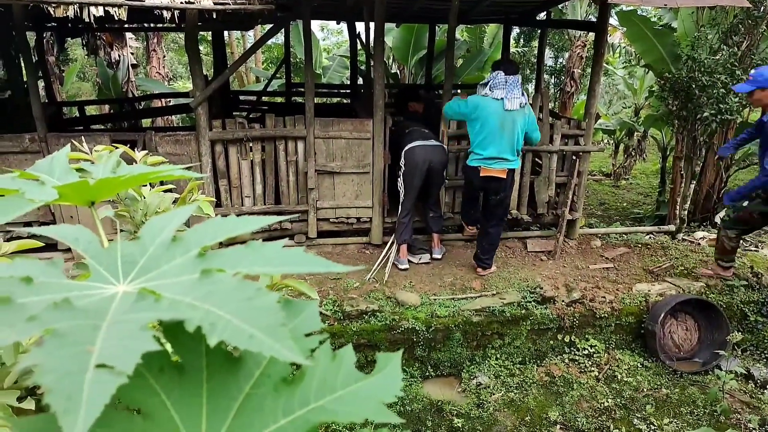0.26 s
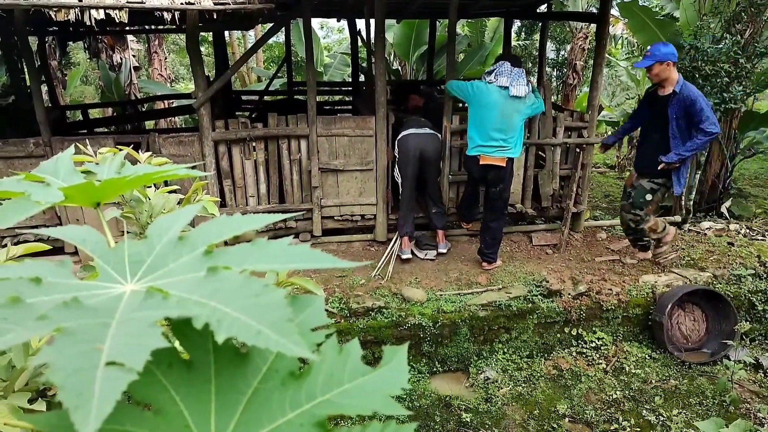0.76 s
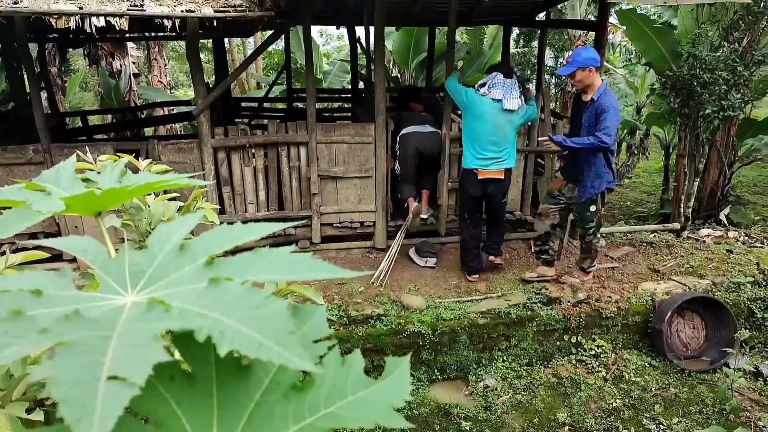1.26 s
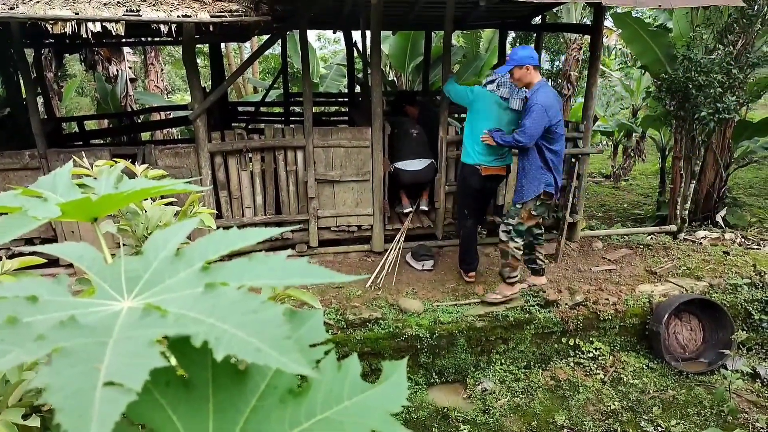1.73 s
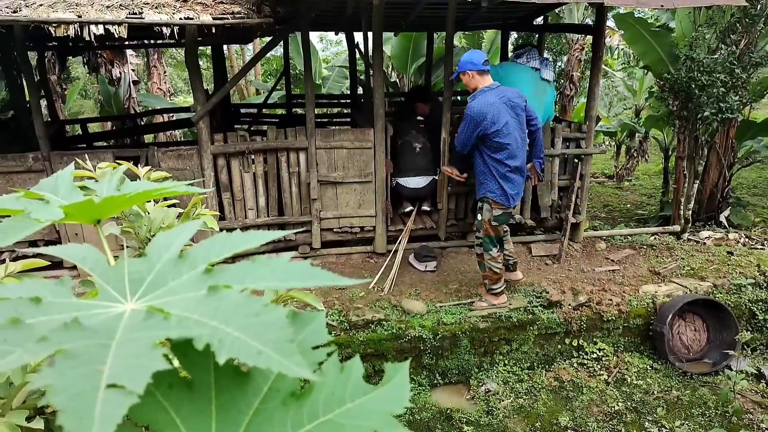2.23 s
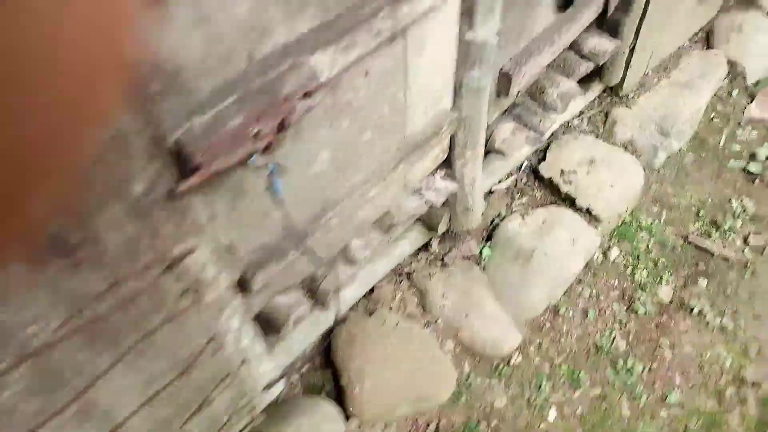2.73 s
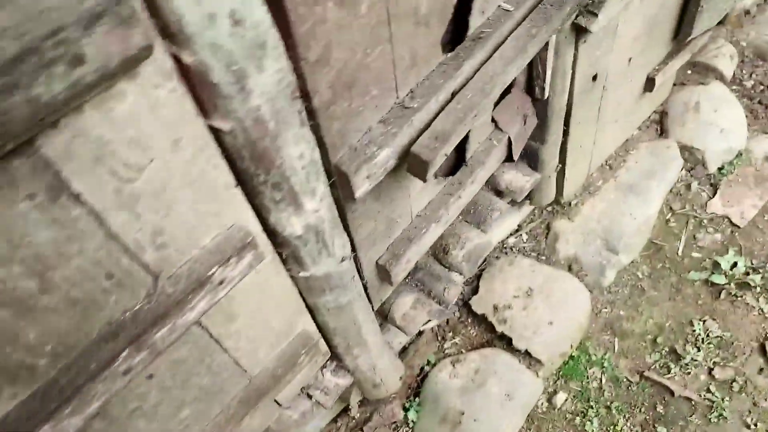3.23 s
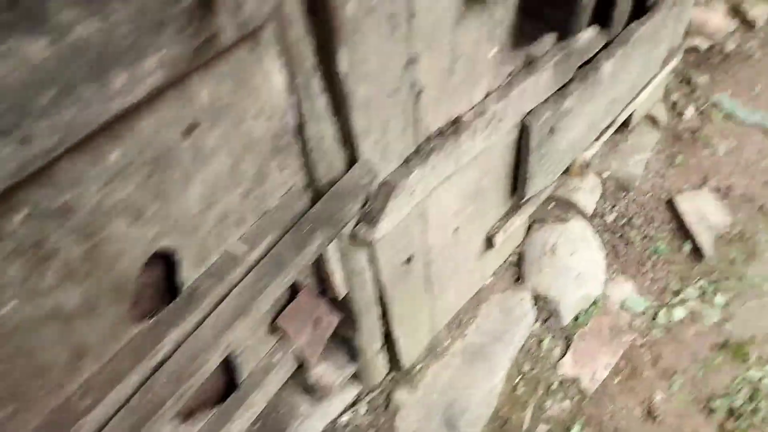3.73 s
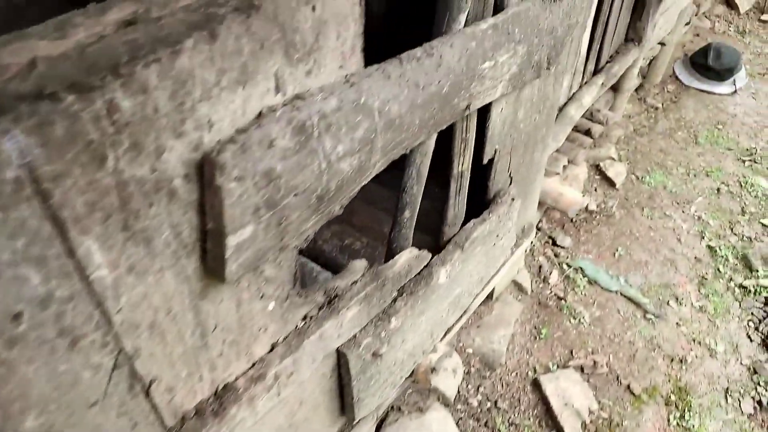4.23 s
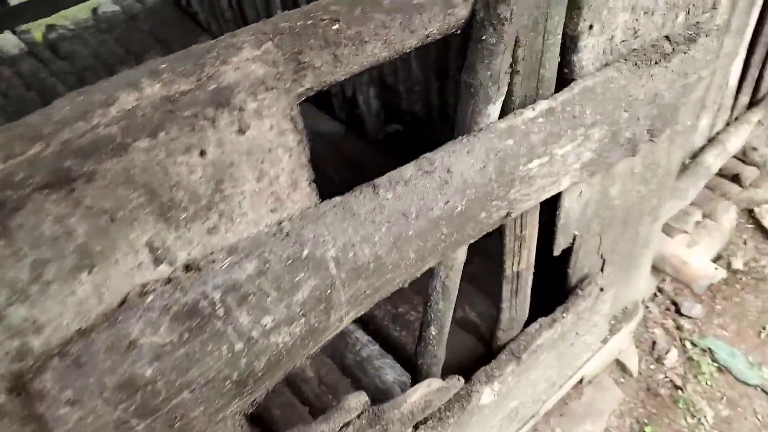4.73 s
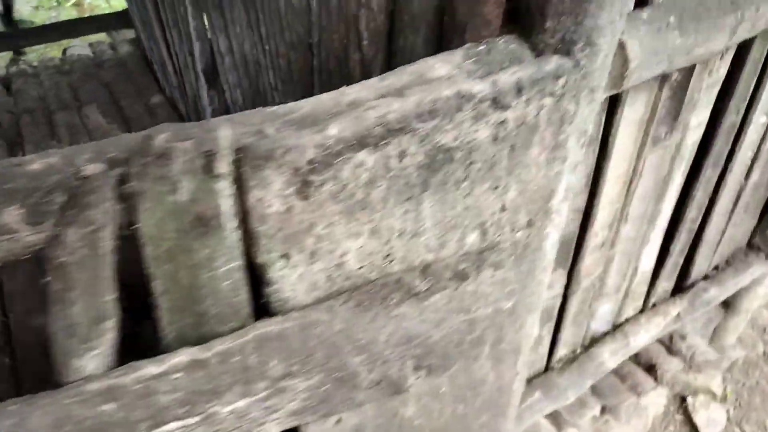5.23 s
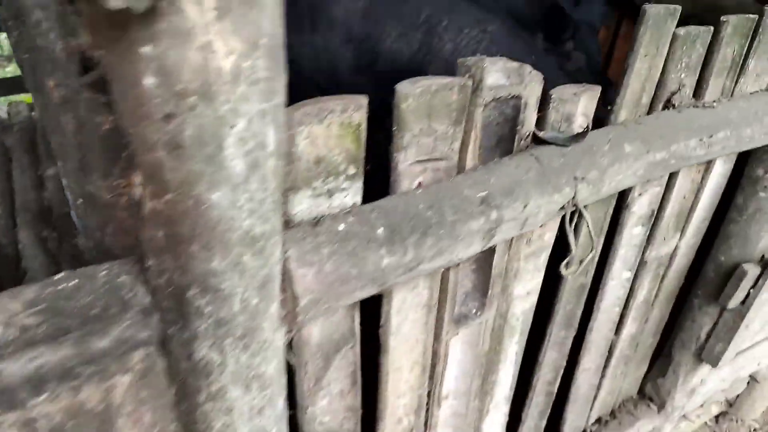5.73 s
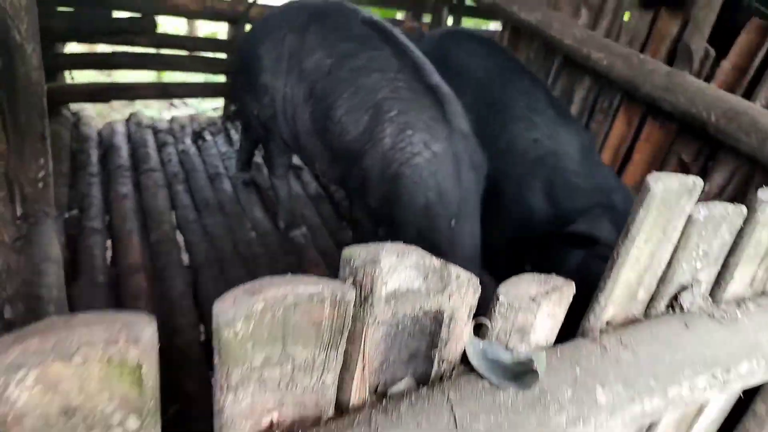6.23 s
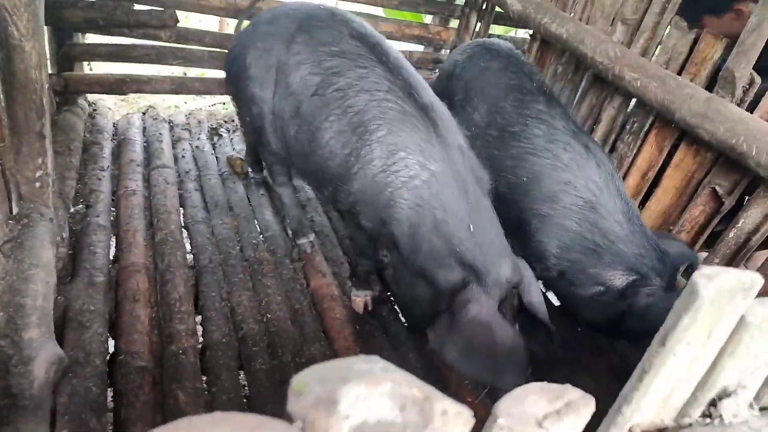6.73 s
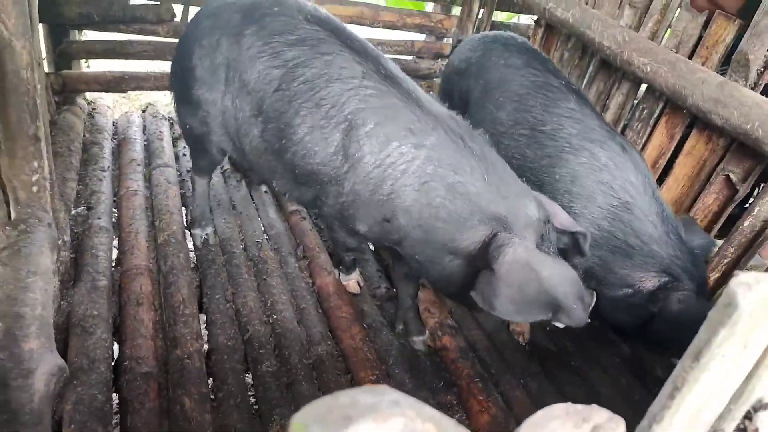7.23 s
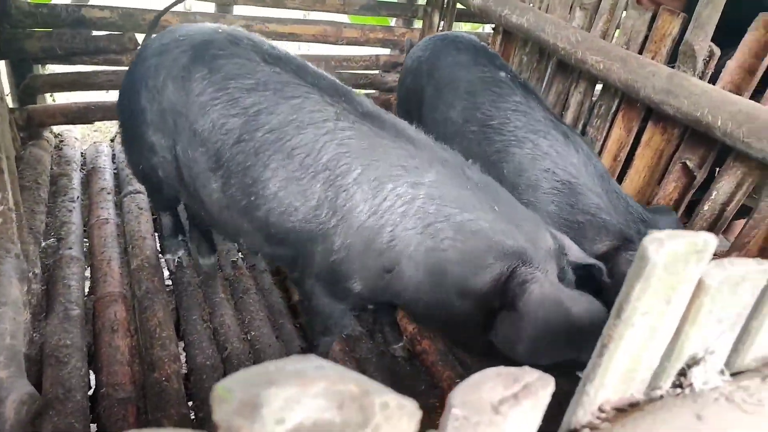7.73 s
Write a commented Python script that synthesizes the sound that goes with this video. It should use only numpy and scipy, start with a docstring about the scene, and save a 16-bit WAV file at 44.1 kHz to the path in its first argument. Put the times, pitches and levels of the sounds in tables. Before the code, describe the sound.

Harsh, whistling pig squeals and throaty grunts in quick succession outdoors; a tiny dropout, then longer, rougher screams right beside wooden planks.

```python
"""Squealing and grunting pigs in a wooden pen

One pig screams in long squeals, first heard from the yard, then beside the boards and over the fence.
A squeal is a whistle near 2 kHz over slower flapping of the folds, roughened into rasp.
Grunts are slow flaps of the throat that ring the snout; a few short squeaks glide between them.
Low yard air lies beneath, and the sound cuts out for an instant before resuming close to the planks."""
import sys
import numpy as np
from scipy import signal
from scipy.fft import rfft, irfft, next_fast_len
from scipy.io import wavfile
from scipy.ndimage import uniform_filter1d

SR = 44100
rng = np.random.default_rng(int(sys.argv[2]) if len(sys.argv) > 2 else 0)


def transcribe(signal):
    """Save signal, clipped to [-1, 1], as a 16-bit WAV file at the path in sys.argv[1]."""
    frames = np.atleast_2d(signal).T
    limited = np.clip(frames, -1, 1)
    pcm = np.round(limited * 32767).astype(np.int16)
    wavfile.write(sys.argv[1], SR, pcm)


N = 351477  # length in samples

# The instant of near silence between the yard and the planks. Each row: time in seconds, gain in dB.
CUT = [(2.602, 0), (2.609, -45), (2.621, -45), (2.628, 0)]


def amp(db):
    """Turns decibels into gain."""
    return 10 ** (np.asarray(db) / 20)


def evened(x):
    """Scales to rms 1."""
    return x / np.sqrt(np.mean(abs(x) ** 2) + 1e-20)


def read(points, hz):
    """Reads a curve joined by straight lines on a log frequency axis."""
    f, value = np.transpose(points)
    return np.interp(np.log(hz + 1), np.log(f + 1), value)


def over_time(points, t):
    """Reads a curve of (seconds, value) joined by straight lines."""
    return np.interp(t, *np.transpose(points))


def bump(x, middle, half):
    """A smooth bell of height 1."""
    return np.exp(-((x - middle) / half) ** 2)


def add(mix, s, sound):
    """Lays a sound into the mix at a time in seconds."""
    part = mix[round(s * SR):][:len(sound)]
    part += sound[:len(part)]


def track(calls):
    """Lays (start, sound) calls on one time line."""
    mix = np.zeros(N)
    for call in calls:
        add(mix, *call)
    return mix


def shaped(x, gain):
    """Filters by a gain that is a function of frequency."""
    size = next_fast_len(len(x) + 2048)
    spectrum = rfft(x, size) * gain(np.fft.rfftfreq(size, 1 / SR))
    return irfft(spectrum, size)[:len(x)]


def band(x, lo, hi):
    """A steep band-pass; bands that share an edge add up without a gap."""
    return shaped(x, lambda f: 1 / (1 + (f / hi) ** 24) - 1 / (1 + (f / lo) ** 24))


def wobble(n, hz):
    """Smooth random motion of rms 1, up to about a rate."""
    return evened(shaped(rng.standard_normal(n), lambda f: np.exp(-.5 * (f / hz) ** 2)))


def loudness(x, size):
    """Running rms over about a number of samples."""
    power = uniform_filter1d(uniform_filter1d(x ** 2, size), size)
    return np.sqrt(abs(power) + 1e-12)


def partials(turns, count):
    """A series of equal harmonics, each with its own random phase."""
    step, wave, out = np.exp(2j * np.pi * turns), 1, 0
    for phase in rng.random(count):
        wave = wave * step
        out = out + wave * np.exp(2j * np.pi * phase)
    return out


def yard(apart=0.93):
    """Steady outdoor air over a slowly changing rumble, its bass nearly alike in both channels."""
    # Spectrum of the yard air. Each row: frequency in Hz, relative density in dB.
    air_curve = [(12, -25), (20, 2.5), (27, -6), (64, -3.5), (181, -17.5), (642, -27), (970, -30),
                 (2340, -23.5), (2690, -16.5), (3170, -28), (5810, -20.5), (7240, -21), (8080, -29),
                 (14400, -43)]
    # Swell of the rumble. Each row: time in seconds, gain in dB.
    rumble_curve = [(0, -1), (1.599, 2), (2.551, 3), (2.7, -6), (4.2, -7), (5.198, 2), (6.6, 2), (7.301, 0),
                    (7.97, 3)]
    air_db, swell_db = -50, .8
    common, side = (shaped(rng.standard_normal(N), lambda f: amp(read(air_curve, f))) for _ in range(2))
    side = apart * (band(side, 500, 16000) + .35 * band(side, 5, 50))
    side = side * np.array([[1], [-1]])
    rumble = band(common, 5, 250)
    air = common - rumble + rumble * amp(over_time(rumble_curve, np.arange(N) / SR))
    return amp(air_db + swell_db * wobble(N, 0.8)) * (air + side) / np.std(common)


def ring(x, size, spread=0.081):
    """Rings the snout's resonances, shifted by one factor and each a little by chance."""
    # Resonances of a grunting snout. Each row: frequency in Hz, width in Hz, level in dB.
    snout_modes = [(57.2, 28, -2), (92.5, 48.6, 9), (173, 35, 4), (257.4, 176, 5.5), (350, 34.4, 16.5),
                   (441.8, 89, 2), (794, 72.5, 3), (1094, 88, -5.5), (1499, 59, -1), (1904, 190, -9.5),
                   (3380, 370, -16.5), (3870, 240, -10), (5620, 11700, -23.5)]
    shifts = size * np.exp(spread * rng.uniform(-1.14, 1, len(snout_modes)))
    out = 0
    for k, (hz, width, db) in enumerate(snout_modes):
        peak = signal.iirpeak(hz * shifts[k], hz / width, SR)
        out = out + amp(db) * signal.lfilter(*peak, x) * (-1) ** k  # neighbours in opposite polarity
    return out


def grunt(start, attack, hold, chest_db, mouth_db, rasp_db, snout_hz, knock=0.38):
    """Slack folds flap almost evenly, slower in a bigger pig; each flap's knock and puff ring the snout."""
    # Deep boom of the grunts as the microphone moves along the pen. Each row: time in seconds, gain in dB.
    boom_curve = [(1.5, 5.5), (3.7, 4), (4.9, 6), (6.5, 9.5), (7.1, 7), (7.6, 3)]
    boom_per_db, usual_db = -0.584, -41  # the harder the grunt, the smaller the share of its boom
    onset_db, fall_db_per_s, tail_s = -11, 381, .09
    opening_range_db = 4.5  # the mouth opens during each grunt
    puff_s, leak, chest_puff = .006, .2, .45  # puff decay, air between puffs, share of puffs in the chest
    treble_leak = 0.19  # share of the highest rasp that leaves the snout

    release = attack + hold
    t = np.arange(0, release + tail_s, 1 / SR)
    n = len(t)
    size = snout_hz / 340
    flap_hz = 46 * size ** .7
    rise_db = onset_db * np.maximum(1 - t / attack, 0)
    envelope_db = rise_db - fall_db_per_s * np.maximum(t - release, 0)
    opening_db = opening_range_db * (np.minimum(t / release, 1) - .5)

    turns = np.cumsum(flap_hz * np.exp(.04 * wobble(n, 25))) / SR
    knocks = evened(np.diff(np.floor(turns), prepend=-1))  # one click a flap
    puff_shape = leak + np.exp(-(turns % 1) / flap_hz / puff_s)
    puffs = evened(puff_shape * rng.standard_normal(n))

    body = ring(knocks + chest_puff * puffs, size)
    boom, chest = band(body, 20, 170), band(body, 170, 520)
    boom_db = over_time(boom_curve, start) + boom_per_db * (chest_db - usual_db)
    chest = (chest + boom * amp(boom_db)) / np.std(chest + boom)

    snout = ring(knock * knocks + puffs, size)
    mouth = band(snout, 520, 1150)
    rasp = band(snout, 1150, 7500) + treble_leak * band(snout, 7500, 16000)
    snout = (mouth + amp(rasp_db) * rasp) / np.std(mouth)
    return start, amp(chest_db + envelope_db) * (chest + amp(mouth_db + opening_db) * snout)


def squeak(start, end, first_hz, last_hz, level_db, jitter):
    """The folds catch for a moment and give one short gliding whistle."""
    n = round((end - start) * SR)
    hz = np.linspace(first_hz, last_hz, n) * (1 + jitter * wobble(n, 170))
    whistle = np.sin(2 * np.pi * np.cumsum(hz) / SR) * amp(2.0 * wobble(n, 100))
    return start, amp(level_db) * evened(whistle) * signal.windows.tukey(n, .6)


def mouthed(drive, throat, gape, stretch, patchy_db=2.5):
    """Formants slide with the pitch and open with the jaw; a slow random unevenness roughens the colour."""
    # Throat and mouth colour with the jaw wide. Each row: frequency in Hz, gain in dB.
    wide_throat = [(350, 2), (575, 2), (870, -12), (1160, 5), (1450, -18), (1750, -2.5), (2030, 16),
                   (2330, -10), (2550, 14), (2760, -33), (3060, -22), (3330, -1), (3560, 5), (3780, -4),
                   (4020, 1.5), (4280, -9), (4680, -14), (5150, 0.5), (5430, 11.5), (5780, 10.5),
                   (6200, 3.5), (6850, 4.5), (7450, 6.5), (7900, -10), (9000, -12), (12600, -18.5),
                   (14500, -25)]
    # fixed hollow from the pen, heard most when the jaw is wide
    hollow_hz, hollow_width_hz, hollow_db = 5100, 170, -22
    hz, t, z = signal.stft(drive, SR, nperseg=512)
    gape, stretch = (np.interp(t * SR, np.arange(len(drive)), c) for c in (gape, stretch))
    where = hz[:, None] / stretch
    patches = rng.standard_normal(z.shape)
    for _ in range(2):
        patches = uniform_filter1d(patches, size=4, axis=0)
        patches = uniform_filter1d(patches, size=22, axis=1)
    colour_db = (1 - gape) * read(throat, where) + gape * read(wide_throat, where)
    colour_db = colour_db + patchy_db * evened(patches)
    colour_db = colour_db + gape * hollow_db * bump(hz[:, None], hollow_hz, hollow_width_hz)
    return signal.istft(z * amp(colour_db), SR, nperseg=512)[1][:len(drive)]


def squeal(contour, voice, throat, usual_hz, drift, jitter, flutter, smear_hz, hiss, fray, buzz, coupling,
           flap_jitter=0.0202, flutter_hz=53, shimmer_db=1.5, formant_waver_db=1.5):
    """A whistle rides on slower flapping of the folds, which adds a buzz and side tones; roughness frays both."""
    # Jaw opening through the scream. Each row: time in seconds, share of the widest gape from 0 to 1.
    gape_curve = [(5.6, 0.09), (6.0, 0.52), (6.35, 1), (6.6, 0.95), (6.8, 0.91), (7.5, 0.4)]
    # Side tones of each whistle line. Each row: distance from the line in flap rates, gain as a factor.
    side_tones = [(-1, 0.3), (1, 1), (2, 0.29)]
    # Undertone at three quarters of the pitch. Each row: middle in seconds, half length in seconds,
    # strength as a factor.
    undertones = [(3.747, 0.32, 5.9), (4.685, 0.055, 5)]
    formant_slide = 0.52  # formants rise with this power of the pitch over its usual value

    s, *columns = np.transpose(contour)
    t = np.arange(s[0], s[-1], 1 / SR)
    n = len(t)
    hz, mid_db, high_db = (np.interp(t, s, c) for c in columns)
    when, *columns = np.transpose(voice)
    cycles, flapping, rough, low_db, chest_db = (np.interp(t, when, c) for c in columns)
    rough = np.clip(rough, 0, 1)
    gape = np.clip(over_time(gape_curve, t), 0, 1)

    pitch = hz * (1 + drift * wobble(n, 30.8) + jitter * rough * wobble(n, 108))
    turns = np.cumsum(pitch) / SR
    flaps = np.cumsum(pitch / cycles * (1 + flap_jitter * rough * wobble(n, 94.2))) / SR
    sides = sum(gain * np.exp(2j * np.pi * (round(k) * flaps + rng.random())) for k, gain in side_tones)
    whistle = partials(turns, count=7) * (1 + coupling * flapping * sides)
    folds = whistle + buzz * flapping * partials(flaps, count=24)
    undertone = sum(strength * bump(t, middle, half) for middle, half, strength in undertones)
    folds = folds + undertone * np.exp(2j * np.pi * turns * 3 / 4)

    # chaotic vibration smears each line; loose tissue flutters
    chaos = (wobble(n, smear_hz) + 1j * wobble(n, smear_hz)) / np.sqrt(2)
    folds = (folds * (1 - rough + rough * chaos)).real
    flutter_turns = np.cumsum(flutter_hz * (1 + 0.15 * wobble(n, 10.04))) / SR
    shake = 1 + flutter * np.sqrt(rough) * np.sin(2 * np.pi * flutter_turns)

    # air escapes in one puff a flap and buries the upper lines first
    puffs = rng.standard_normal(n) * (1 + np.cos(2 * np.pi * flaps))
    air = rough * hiss * puffs + shaped(puffs, lambda f: fray * np.minimum(f / 6000, 1) ** 2)
    drive = shake * (folds / loudness(folds, size=1500) + rough * air)
    cry = mouthed(drive, throat, gape, (hz / usual_hz) ** formant_slide)

    # each formant band is levelled, then follows its own course
    edges = [(100, 1750), (1750, 2950), (2950, 4830), (4830, 16000)]
    chest, low, mid, high = (band(cry, *pair) for pair in edges)
    low_db = low_db + formant_waver_db * wobble(n, 26)
    levels = [(chest, chest_db), (low, low_db), (mid, 0), (high, high_db)]
    cry = sum(amp(db) * formant / loudness(formant, size=1100) for formant, db in levels)
    level = amp(mid_db + shimmer_db * wobble(n, 6.4))
    return s[0], cry * level * signal.windows.tukey(n, 0.002 * SR / n)


def pen(x, wet_db, slap_db, width=1.14):
    """Direct sound, first slaps off the planks and a short tail; only the bass is alike at both microphones."""
    # Reverberation of the pen. Each row: frequency in Hz, time to fall 60 dB in seconds.
    decay = [(100, 0.46), (500, 0.26), (2000, 0.22), (6000, 0.076), (14000, 0.004)]
    # First echoes off the planks. Each row: delay in seconds, relative gain at the left microphone,
    # relative gain at the right.
    planks = [(.0013, 1, 0.1), (.0029, 0.11, -0.049), (.0047, -0.38, -0.014), (.0071, -0.1, 0.76),
              (0.01, 0.31, -0.51), (0.017, -0.14, 0.36)]
    taps, slaps = np.zeros((2, 2, SR // 2))
    at = np.arange(100, SR // 2 - 20, 20)
    places = at + rng.integers(0, 20, (2, len(at)))
    np.put_along_axis(taps, places, rng.choice([-1., 1.], (2, len(at))), 1)
    hz, t, z = signal.stft(taps, SR, nperseg=256)
    fading = z * amp(-60 * t / read(decay, hz)[:, None])
    tail = signal.istft(fading, SR, nperseg=256)[1][:, :SR // 2]
    for delay, *gains in planks:
        slaps[:, round(delay * SR)] = gains
    echo = amp(wet_db) * tail / np.linalg.norm(tail[0]) + amp(slap_db) * slaps
    side = width * shaped((echo[0] - echo[1]) / 2, lambda f: f / np.hypot(f, 800))
    stereo_echo = echo.mean(0) + np.array([side, -side])
    return x + signal.fftconvolve(x[None], stereo_echo, axes=1)[:, :N]


def placed(pair, side):
    """Tilts the two channels against each other by frequency, their gains always averaging one."""
    return np.array([shaped(x, lambda f: 2 / (1 + amp(-sign * read(side, f))))
                     for x, sign in zip(pair, (1, -1))])


def scene():
    """The squealing pig, heard from the yard, beside the boards and over the fence, among grunting ones."""
    # Contours of the squeals, in the yard and then close by; a long squeal runs on through overlapping
    # contours. Each row: time in seconds, pitch in Hz, middle formant in dB before the mix,
    # high formant in dB above it.
    far_squeals = [
        [(0.0, 1870, -19, -2.5), (.035, 1803, -25.5, 0.5), (.07, 1860, -24.5, -1), (.13, 1866, -25.5, -1.5),
         (.17, 1850, -28.5, 9), (.24, 1789, -28.5, 7.5), (.268, 1765, -29.5, 7.5), (.295, 1644, -58, 17),
         (.33, 1643, -49, -8)],
        [(.665, 1530, -62, 20), (.697, 1697, -18.5, -14.5), (.72, 1840, -35, -1), (.77, 1900, -54, -8)],
        [(.78, 1895, -40, -7), (.835, 2124, -21.5, -3.5), (.875, 1943, -28, 0.5), (.92, 1940, -32.5, 1),
         (.98, 1954, -27.5, 8), (1.008, 1957, -24, -5), (1.04, 1884, -34, 3), (1.145, 1790, -38, -2)],
        [(1.135, 1839, -36.5, -2), (1.195, 1932, -27.5, 8), (1.26, 1874, -27, -1), (1.32, 1846, -23, -3),
         (1.37, 1797, -35, 4), (1.408, 1845, -25.5, 1), (1.44, 1840, -49, 9)],
        [(1.432, 1812, -38, 10), (1.47, 1894, -28, 5.5), (1.51, 1920, -14.5, -7.5), (1.56, 1930, -15.5, -4.5),
         (1.61, 1969, -13.5, -6.5), (1.636, 1940, -16, -3), (1.655, 1716, -29, 1), (1.68, 1614, -69, 9)],
        [(1.826, 1516, -37, -9), (1.872, 1733, -44, -4), (1.925, 1941, -21.5, -15.5), (2.01, 1930, -24, -5),
         (2.055, 1934, -20.5, 0), (2.15, 1951, -21, -2.5), (2.22, 2056, -22.5, -0.5), (2.265, 1910, -18, -5),
         (2.32, 1926, -17.5, -4.5), (2.36, 1903, -21.5, -7), (2.405, 1903, -52, 19)],
        [(2.398, 1860, -36, 0), (2.42, 1952, -18.5, -5), (2.48, 1930, -14.5, -9.5), (2.54, 1916, -21.5, -7.5),
         (2.606, 1880, -29.5, -6)],
    ]
    near_squeals = [
        [(2.624, 2153, -68, 6), (2.68, 2163, -46.5, 3.5), (2.78, 2247, -38.5, 3), (2.83, 2260, -35, 1),
         (2.95, 2244, -35.5, 2), (3.05, 2304, -28, 0), (3.15, 2342, -26, 3), (3.27, 2340, -25.5, 0.5),
         (3.39, 2360, -27, 2), (3.52, 2107, -29, 3.5), (3.6, 2258, -25, 5), (3.75, 2247, -26.5, 5.5),
         (3.84, 1913, -36, 6), (3.93, 1870, -72, 12)],
        [(4.56, 1951, -52, 2), (4.64, 2035, -39.5, 1.5), (4.77, 2189, -34, 1.5), (4.9, 2210, -34, 1.5),
         (5.14, 2203, -32.5, 5.5), (5.33, 2276, -29, 3), (5.55, 2302, -27.5, 0.5), (5.87, 2282, -27.5, 3),
         (6.08, 2353, -26.5, 4), (6.3, 2372, -23, 3), (6.45, 2425, -21, 0.5), (6.58, 2352, -22, 1.5),
         (6.76, 2168, -22, -3), (6.86, 2058, -23.5, -4.5), (6.98, 1885, -64, 12)],
        [(7.49, 1799, -49, -4), (7.53, 1902, -32, -8.5), (7.64, 1942, -35.5, 7), (7.78, 1952, -33, 6),
         (7.83, 2047, -30.5, 7), (7.9, 2140, -26.5, 4.5), (7.975, 2169, -27, 4)],
    ]
    # The voice through each contour, in the same order. Each row: time in seconds, whistle cycles per flap,
    # flapping strength 0 to 1, roughness 0 to 1, low formant and chest in dB above the middle formant.
    far_voices = [
        [(0, 2.9, 0.93, 0.25, -4.5, 0), (.05, 4.13, 0.8, 0.25, -3.5, -35), (.13, 3.22, 0.7, 0.15, -6, -0.5),
         (.2, 4.24, 0.8, 0.091, -5, -19), (.29, 3.8, 0.3, 0.46, -13, -8.5)],
        [(.665, 3.9, 0.29, .4, -26, -25), (.75, 2.7, 0.66, 0.48, -22, 3)],
        [(.79, 3.65, .3, 0.21, -15, -13), (.84, 3.8, 0.87, 0.26, -2.5, -13.5), (.93, 3.67, 1, 0.31, -2, 2),
         (1.0, 3.78, 0.62, 0.27, -5, -2), (1.07, 3.84, 0.49, 0.33, -15, -24)],
        [(1.15, 3.6, 0.5, 0.28, -15, -19), (1.22, 3, 0.95, 0.25, -12, 7), (1.31, 3, 0.21, 0.28, -9, 3),
         (1.36, 3.8, 0.52, 0.24, -13, -27), (1.42, 4, 0.22, 0.077, -11, -9)],
        [(1.44, 3.6, 0.029, 0.092, -8, -17), (1.52, 3.3, 0.36, 0.3, -24.5, -24),
         (1.61, 3.3, 0.27, 0.22, -14, -17), (1.66, 3.6, 0.38, 0.97, -15, -4.5)],
        [(1.83, 3.3, 0.06, 0.17, -20, -11), (1.95, 3.3, 0.8, 0.34, -27, -18.5),
         (2.04, 3.1, 0.81, 0.35, -13.5, -7.5), (2.11, 3, 0.83, 0.21, -7.5, 4), (2.2, 3, 1, 0.12, -5, 1),
         (2.27, 3.1, 0.77, 0.28, -6, -8), (2.33, 3.3, 1, 0.31, -14.5, -21), (2.4, 3.8, 0.67, 0.18, 2, -18)],
        [(2.4, 4.1, 0.25, 0.14, -3, -31), (2.45, 4.1, 0.38, 0.098, -2, -24), (2.5, 4.1, 0.4, 0.14, -2.5, -19.5),
         (2.6, 4.3, 0.92, 0.34, -7, -15)],
    ]
    near_voices = [
        [(2.65, 4, 0.71, 0.31, 3.5, -9.5), (2.95, 4, 0.78, 0.33, 1.5, -5), (3.1, 4, 0.92, 0.29, 4, -11.5),
         (3.27, 4, 0.96, 0.032, 3, -3.5), (3.4, 4, 0.67, 0.38, -1.5, -12), (3.55, 4, 0.83, 0.56, -2.5, -5),
         (3.7, 4, 0.81, 0.61, -6, -7.5), (3.85, 4, 0.81, .65, 5.5, 9)],
        [(4.58, 4, 0.53, 0.3, -25, -13), (4.7, 4, 0.7, 0.4, -1, 2), (4.82, 4, 1, 0.2, 5, -7),
         (4.95, 4, 1, .3, 6, -3), (5.06, 4, 1, 0.18, 5, 4), (5.2, 4, 1, .22, 7, 1),
         (5.34, 4, .9, 0.08, 3.5, -1), (5.5, 4, 0.7, 0.27, 2.5, -8), (5.9, 4, 0.8, 0.36, 4.5, -8),
         (6.2, 4, 1, 0.42, 1.5, -7), (6.48, 4, 1, .4, -4, -10), (6.75, 4, 0.9, 0.55, -4, -8),
         (6.92, 4.2, 0.75, 0.8, -8, -2)],
        [(7.5, 5.7, 0.6, 0.21, -12, -7), (7.6, 5.9, 0.57, 0.35, 3, -11), (7.72, 5.35, 1, 0.33, -5, -7),
         (7.84, 4.05, 0.74, 0.64, 3, -9), (7.96, 4.2, 0.68, 0.54, -4, -8.5)],
    ]
    # Throat and mouth colour from the yard, of the last shrill contour there, beside the boards and
    # over the fence. Each row: frequency in Hz, gain in dB.
    far_throat = [(350, -13), (570, 2), (700, -5), (820, -7), (1030, 3.5), (1270, 10), (1550, -27),
                  (1900, -6.5), (2150, -9), (2550, -3), (2720, 2), (2900, -4), (3270, 3), (3550, -1.5),
                  (3850, 7.5), (4400, -2), (4950, -5), (5350, -8), (5800, 4), (6400, -1), (7100, -5.5),
                  (7800, -13), (8500, -19), (12000, -20), (14500, -37)]
    shrill_throat = [(350, -14), (650, 16.5), (1000, -4), (1450, 4), (1700, -8), (1930, 8), (2170, -2),
                     (2400, -9.5), (2900, -1), (3150, -22), (3450, 3), (3850, 4), (4330, 3.5), (4900, -11),
                     (5400, -9), (5800, 5), (6300, 2.5), (6800, 2), (7700, -6.5), (8500, -14),
                     (12000, -12.5), (14500, -33)]
    board_throat = [(350, -10), (580, -11), (850, -13), (1150, -7.5), (1420, 0), (1720, -11.5), (1980, -21),
                    (2290, 15), (2600, -7), (2890, -5), (3150, -4), (3450, -3.5), (4030, 1.5), (4300, -9),
                    (4700, -3), (5200, 4), (5800, 7.5), (6350, -2), (7000, -2), (7700, -12.5),
                    (8300, -22.5), (9500, -22), (12500, -17), (14500, -51)]
    near_throat = [(350, -12), (570, -16), (850, -16), (1130, 7.5), (1400, -1), (1700, -6.5), (1950, -7),
                   (2280, 18), (2520, 4), (2720, -39), (3080, -23), (3390, -0.5), (3700, 1.5), (3960, -1),
                   (4300, -27), (4560, -5.5), (5000, 3), (5700, 4.5), (6200, 6.5), (6800, 3), (7600, 1.5),
                   (8100, -19), (8600, -9), (9500, -12), (12500, -14), (14500, -37)]
    # Left against right for the squeals at each place. Each row: frequency in Hz, left minus right in dB.
    far_side = [(600, 3), (1300, 2), (2300, 0), (4000, -14), (6000, -6), (14000, -1)]
    board_side = [(600, 6), (1300, -3), (2300, -6.5), (4200, -14), (7800, -11), (14000, -8)]
    near_side = [(600, 1.5), (1300, 4), (2300, -5.5), (4200, -14), (7800, -8.5), (14000, -4.5)]
    # Each row: start in seconds, attack in seconds, hold in seconds, chest level in dB before the mix,
    # mouth in dB above the chest, rasp in dB relative to the mouth, snout pitch in Hz.
    grunts = [ (0.033, 0.019, 0.031, -36, 1.5, -3, 327), (0.3, 0.032, 0.0098, -34, -6.5, 0.5, 342),
              (0.391, 0.019, 0.0047, -43.5, 1, 5, 361), (0.592, 0.0051, 0.13, -42.5, 1.5, -0.5, 328.3),
              (0.887, 0.023, 0.043, -41.5, -3.5, 10, 341), (1.09, 0.028, 0.025, -33, -5.5, 1, 355),
              (1.337, 0.018, 0.031, -39.5, -3, 4, 351), (1.443, 0.027, 0.093, -39.5, 2, 1, 326.7),
              (1.647, 0.0051, 0.05, -38, -4.5, 7, 337.5), (1.723, 0.026, 0.026, -34.5, -8.5, 5.5, 348.3),
              (1.872, 0.027, 0.046, -42.5, 4, 0.5, 336.5), (2.088, 0.031, 0.0072, -30, -6.5, 10, 331),
              (2.222, 0.023, 0.13, -42.5, 7, 5, 342.5), (2.849, 0.03, 0.041, -23.5, -8.5, 9, 356),
              (3.123, 0.03, 0.037, -33.5, -1, -3, 330.4), (3.363, 0.022, 0.083, -28, -5.5, 7, 333.7),
              (3.641, 0.02, 0.11, -29, -8.5, 13, 324), (3.772, 0.031, 0.031, -25, -4, 9, 331.2),
              (4.42, 0.001, 0.018, -47.5, 5.5, -25.5, 346), (4.466, 0.0011, 0.038, -40.5, 5.5, -6.5, 333),
              (4.855, 0.025, 0.011, -34.5, -19, -20, 296), (4.912, 0.021, 0.031, -33, -1, 9, 353.4),
              (5.088, 0.063, 0.024, -36, -1.5, 7.5, 334.7), (5.365, 0.033, 0.1, -34.5, 4.5, 3, 359.4),
              (5.701, 0.029, 0.036, -19.5, -5, 8, 339.3), (5.776, 0.011, 0.021, -39, 8.5, 10, 334.3),
              (5.936, 0.022, 0.092, -30.5, 1, 8.5, 353.2), (6.242, 0.032, 0.1, -30.5, 1, 6.5, 341.5),
              (6.525, 0.02, 0.076, -28.5, -7, 14, 341), (6.634, 0.027, 0.046, -21, -0.5, 5, 347.4),
              (6.806, 0.032, 0.072, -26.5, 0.5, 4.5, 333), (7.038, 0.0025, 0.044, -18, -4.5, 6.5, 354.3),
              (7.15, 0.0011, 0.0063, -38, 12.5, -6, 330), (7.175, 0.001, 0.029, -24.5, -0.5, 5, 335.3),
              (7.387, 0.0046, 0.0057, -43.5, 5, -21, 342), (7.421, 0.01, 0.056, -35, 4, -12, 334.6),
              (7.543, 0.0015, 0.067, -20, -9, 5.5, 288), (7.637, 0.011, 0.058, -26.5, -3, 5, 348),
              (7.777, 0.0028, 0.073, -27.5, -11, 10, 323.2), ]
    # Each row: start in seconds, end in seconds, first pitch in Hz, last pitch in Hz,
    # level in dB before the mix, pitch jitter as a share.
    squeaks = [(3.775, 3.862, 1653, 1270, -24, 0.028), (3.793, 3.877, 3065, 2714, -20.5, 0.026),
               (4.468, 4.562, 2960, 3070, -43.5, 0.025), (7.192, 7.22, 3050, 3010, -19.5, 0.0086),
               (7.44, 7.538, 793, 900, -36, .02), (7.497, 7.559, 1150, 1397, -31.5, 0.01),
               (7.583, 7.652, 1048, 1005, -28, .012)]

    far_throats = [far_throat] * (len(far_squeals) - 1) + [shrill_throat]
    far = track(squeal(*call, usual_hz=1900, drift=.004, jitter=.028, flutter=.22, smear_hz=70,
                       hiss=.35, fray=.22, buzz=.45, coupling=1)
                for call in zip(far_squeals, far_voices, far_throats))
    near_throats = [board_throat, near_throat, near_throat]
    near = [squeal(*call, usual_hz=2280, drift=.003, jitter=.028, flutter=.2, smear_hz=75,
                   hiss=.65, fray=2, buzz=1, coupling=.25)
            for call in zip(near_squeals, near_voices, near_throats)]
    from_yard = placed(pen(far, wet_db=-8.5, slap_db=-7.0), far_side)
    from_boards = placed(pen(track(near[:1]), wet_db=-6, slap_db=0), board_side)
    from_fence = placed(pen(track(near[1:]), wet_db=-6, slap_db=0), near_side)

    cut_s = CUT[0][0]
    far_grunts = track(grunt(*row) for row in grunts if row[0] < cut_s)
    far_grunts = pen(far_grunts, wet_db=-5, slap_db=-32)
    near_grunts = track(grunt(*row) for row in grunts if row[0] > cut_s)
    near_grunts = near_grunts + track(squeak(*row) for row in squeaks)
    near_grunts = pen(near_grunts, wet_db=-8, slap_db=-18)

    squeals = amp(-1.66) * from_yard + amp(-3.5) * (from_boards + from_fence)
    return squeals + amp(-3.5) * (far_grunts + near_grunts) + yard()


def record(dry):
    """The loudest peaks are rounded off; a brief dropout; then the top of the treble is cut."""
    edge_hz = 14400
    rounded = dry / (1 + (dry / .9) ** 6) ** (1 / 6)
    cut = amp(over_time(CUT, np.arange(N) / SR))
    low_pass = signal.firwin(511, edge_hz, window=("kaiser", 9), fs=SR)
    return signal.oaconvolve(rounded * cut, low_pass[None], "same")


dry = scene()
out = record(dry)
transcribe(out)
```